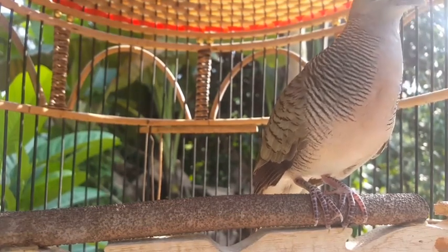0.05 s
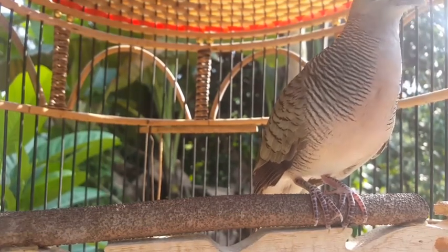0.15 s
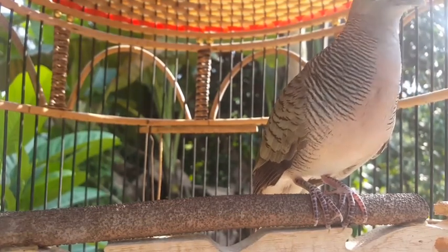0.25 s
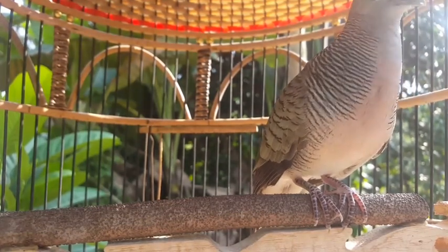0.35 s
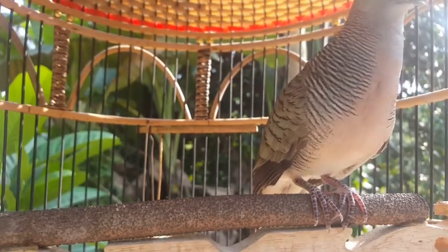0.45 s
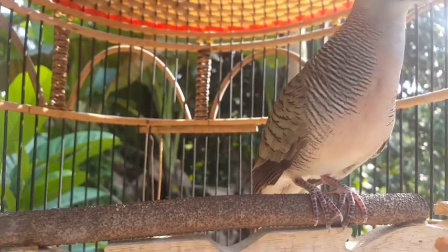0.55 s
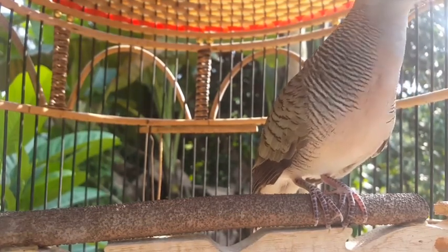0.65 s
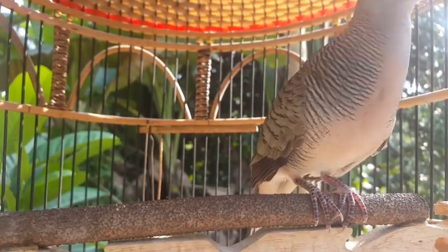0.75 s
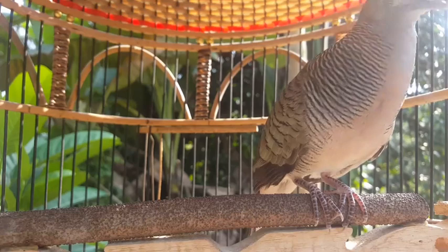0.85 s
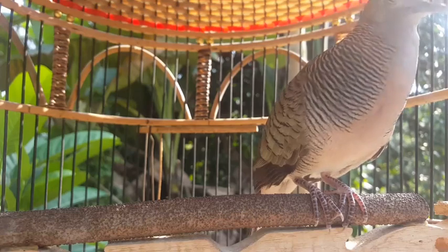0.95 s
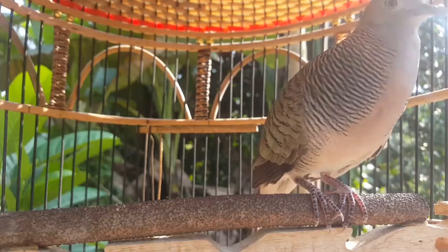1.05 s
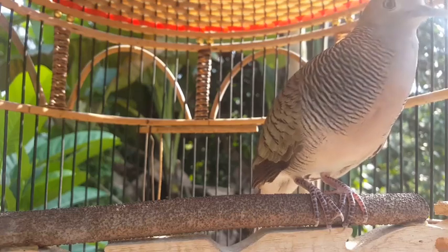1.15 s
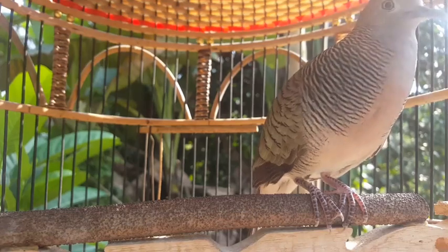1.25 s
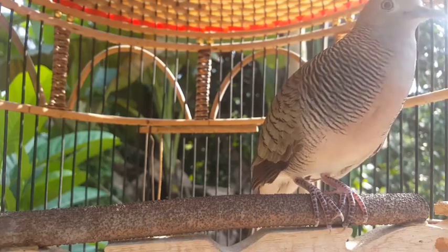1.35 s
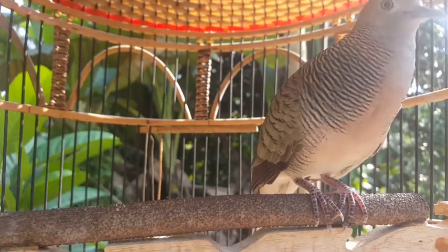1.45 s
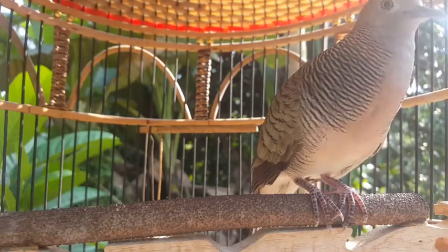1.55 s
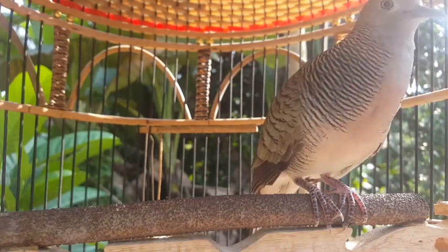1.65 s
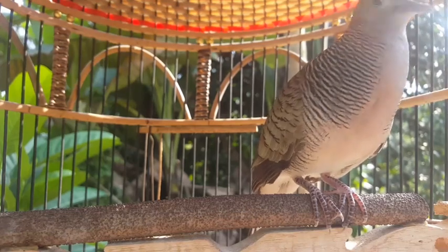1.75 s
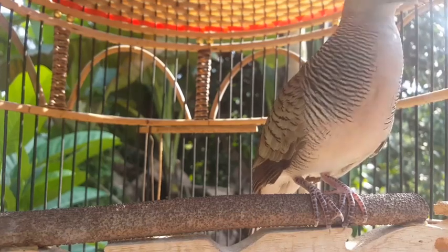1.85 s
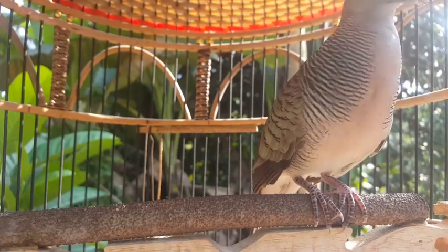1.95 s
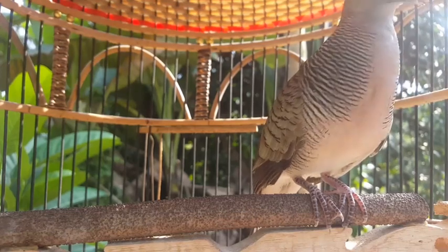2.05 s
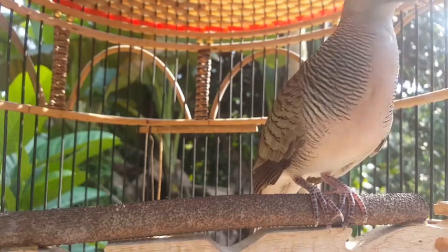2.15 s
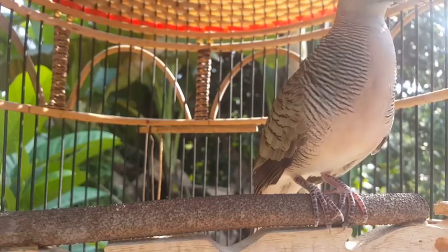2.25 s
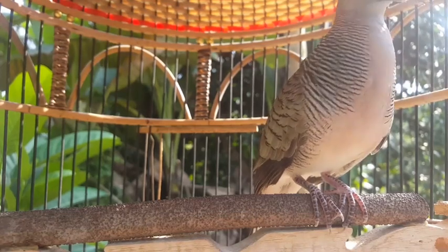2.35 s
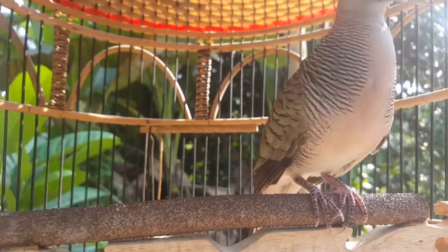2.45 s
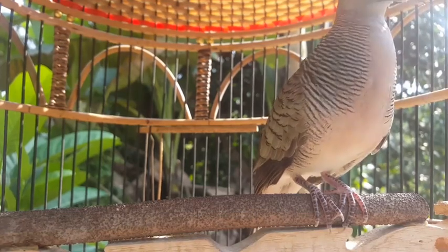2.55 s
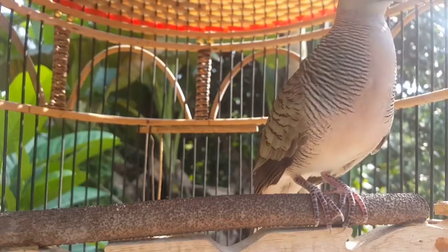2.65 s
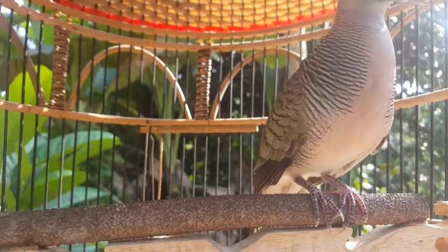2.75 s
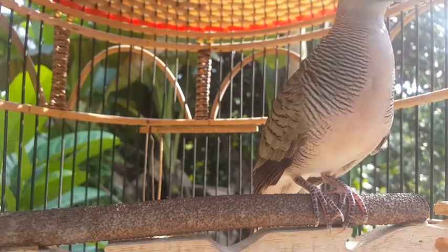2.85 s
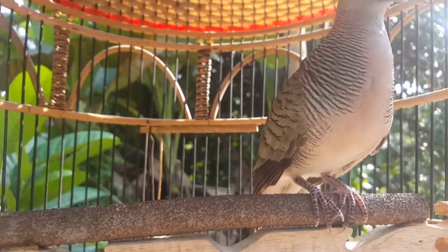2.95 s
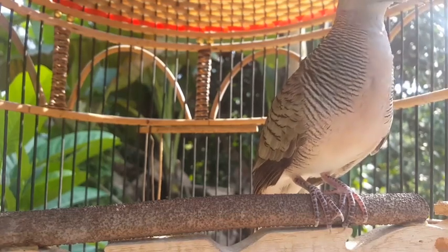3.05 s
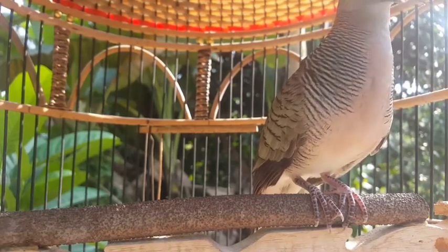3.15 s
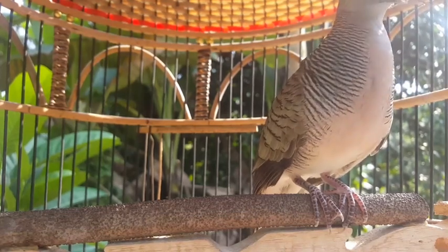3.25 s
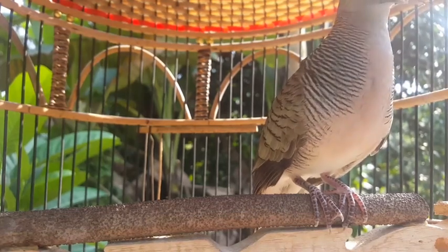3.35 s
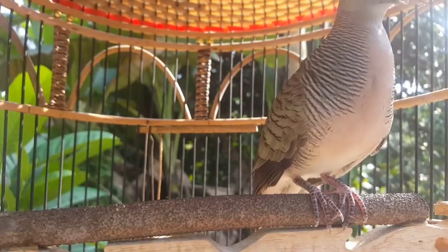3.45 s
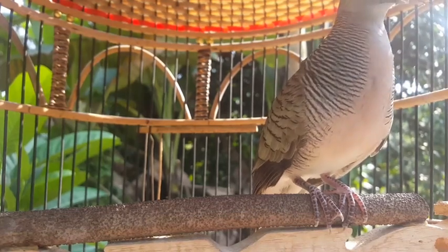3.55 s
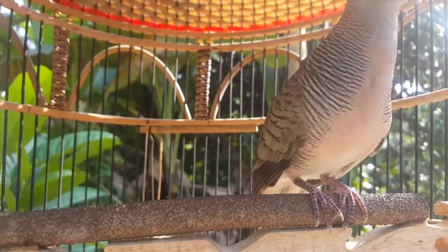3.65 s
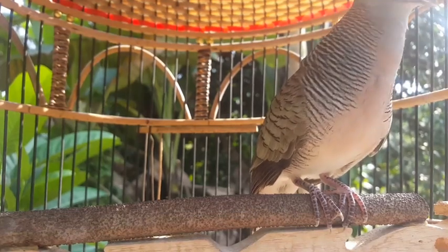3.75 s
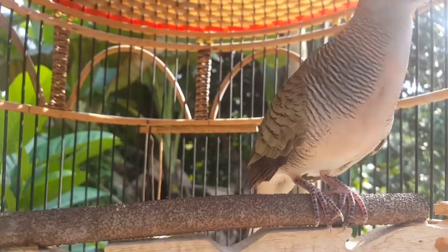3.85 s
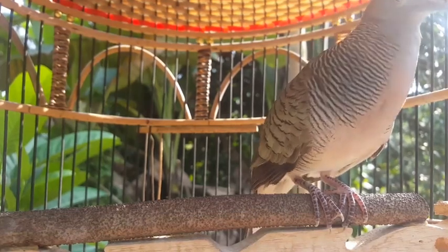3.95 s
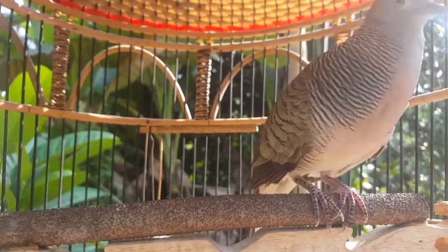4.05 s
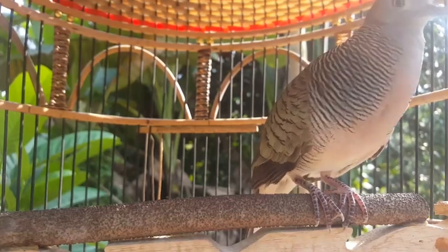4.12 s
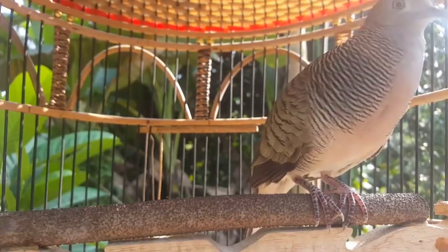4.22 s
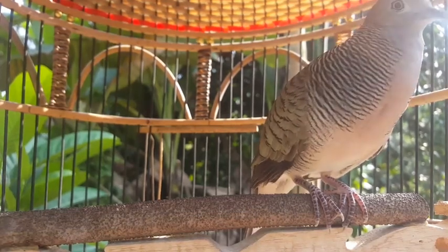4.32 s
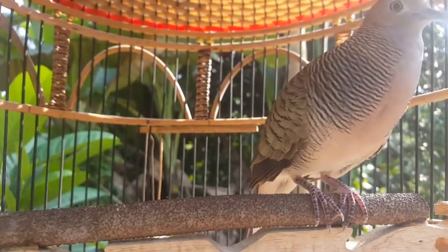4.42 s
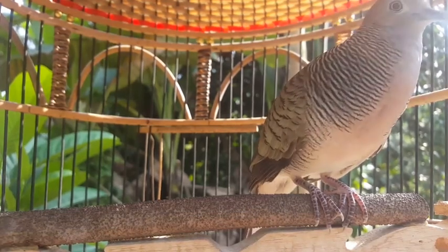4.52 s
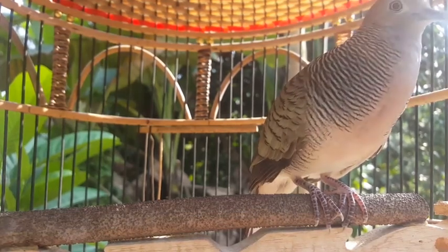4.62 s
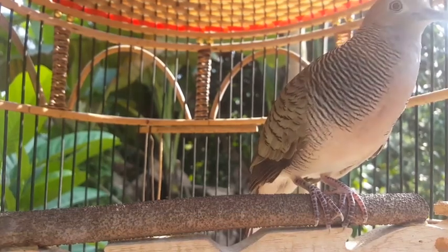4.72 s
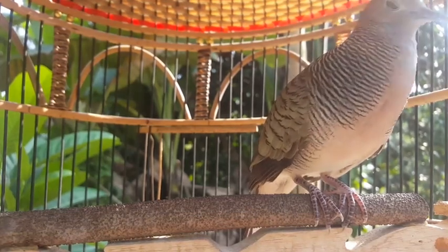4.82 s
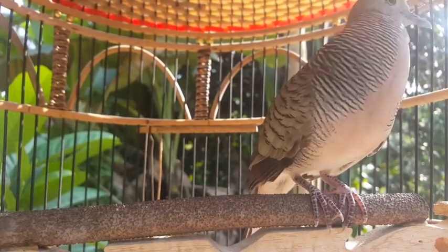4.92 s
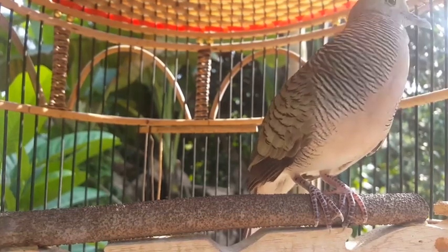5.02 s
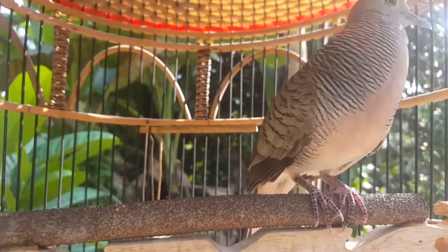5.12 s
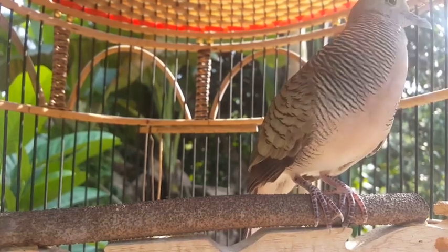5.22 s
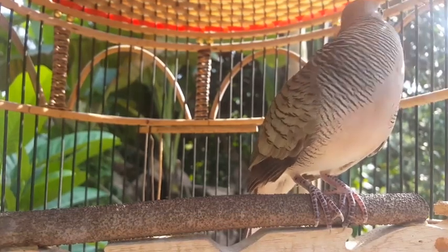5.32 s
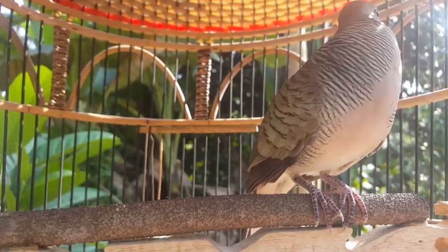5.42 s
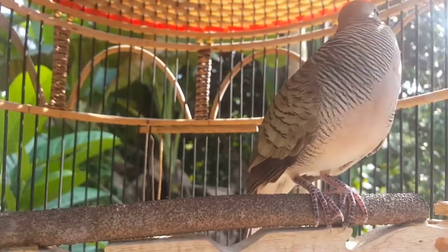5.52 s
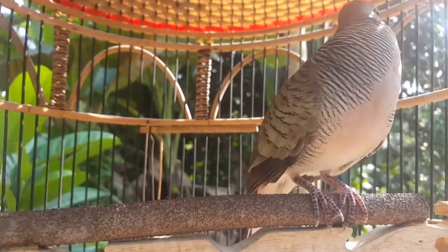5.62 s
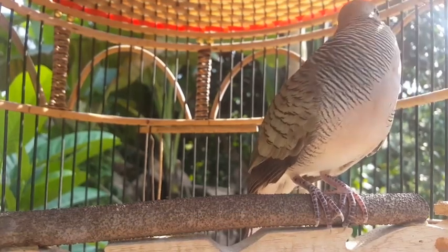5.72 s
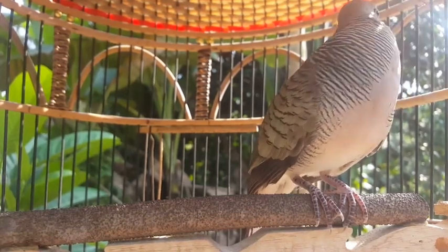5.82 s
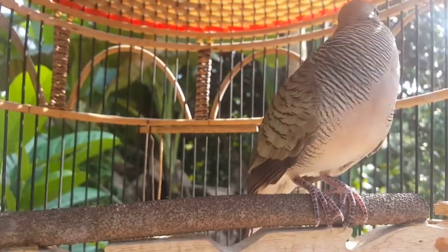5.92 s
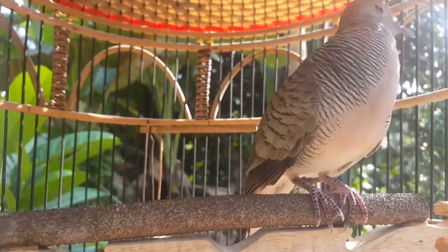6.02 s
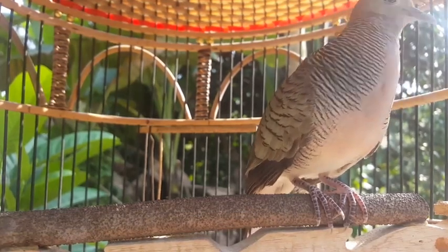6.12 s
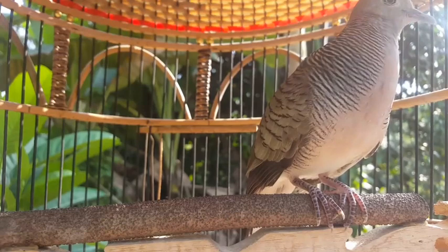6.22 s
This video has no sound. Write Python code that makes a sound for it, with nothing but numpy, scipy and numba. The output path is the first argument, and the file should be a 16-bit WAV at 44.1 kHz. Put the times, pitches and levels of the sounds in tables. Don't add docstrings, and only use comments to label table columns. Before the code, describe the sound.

A caged dove gives two loud, bubbly cooing calls close by while a single-cylinder motorbike thuds past behind and slowly draws away outdoors.

```python
import sys
import numpy as np
from scipy import signal
from scipy.fft import rfft, irfft
from scipy.io import wavfile
from scipy.ndimage import uniform_filter1d
from numba import njit

SR = 44100
rng = np.random.default_rng(int(sys.argv[2]) if len(sys.argv) > 2 else 0)


def generate_wav(sig):
    pcm = np.round(np.clip(np.atleast_2d(sig).T, -1, 1) * 32767).astype(np.int16)
    wavfile.write(sys.argv[1], SR, pcm)


def decibels_to_gain(level_db):
    exponent = np.asarray(level_db, float) / 20
    return 10 ** exponent


N = 276948
T = np.arange(N) / SR

# start_s, register_flip_s, end_s, top_pitch_hz, level_db
COO_NOTES = [
    (.8865, .921, 1.082, 1158, -9.5),
    (1.082, 1.095, 1.124, 1028, -9),
    (1.151, 1.158, 1.176, 880, -13),
    (1.2265, 1.239, 1.262, 978, -10),
    (1.325, 1.337, 1.393, 1018, -10),
    (3.993, 4.023, 4.190, 1160, -9.5),
    (4.192, 4.200, 4.231, 1028, -8.5),
    (4.259, 4.272, 4.289, 950, -10.5),
    (4.338, 4.349, 4.382, 998, -9.5),
    (4.451, 4.463, 4.528, 1030, -8.5),
]
# share_of_length (0-1), pitch_ratio, level_db
LONG_NOTE = [(0, .93, 2.5), (.13, 1.0, .5), (.46, .993, .8), (.48, .98, 1.5), (.72, .95, .5),
             (.75, .935, 2.5), (.84, .95, 2), (.93, .885, .5), (1, .885, -5)]
SHORT_NOTE = [(0, .985, -.5), (.3, 1.0, .5), (.6, .98, -.5), (.8, .95, -3), (.9, .86, -8), (1, .85, -16)]
TIED_NOTE = [(0, .99, -1.5), (.4, 1.0, 3), (.65, .98, 1), (.85, 0.89, -7), (1, 1, -17)]
CLOSING_NOTE = [(0, 0.98, -1.5), (.25, 0.98, 1), (.6, .99, -1), (.8, 0.97, -3.5), (.87, .83, -10.5),
                (1, 0.72, -17)]
# harmonic_number, level_db
VOICE_OVERTONES = [(2, -35), (3, -48), (5, -55)]
# time_s, level_db
THROAT_CREAKS = [(.8609, -25), (.8641, -28), (.868, -20.5), (.872, -21), (.8756, -22), (.8787, -15),
                 (.8816, -17), (.8836, -30), (1.1374, -26.5), (1.1432, -24), (1.1452, -25.5), (1.2122, -25),
                 (1.2178, -25.5), (1.2197, -24), (1.2215, -23), (1.3109, -28), (1.3162, -26.5),
                 (1.3191, -25), (1.322, -25), (3.969, -28), (3.9733, -22), (3.9778, -23), (3.9806, -21.5),
                 (3.9837, -21), (3.9871, -19), (3.9887, -16), (3.9904, -28.5), (4.246, -30), (4.2506, -22),
                 (4.2544, -28.5), (4.3235, -25.5), (4.3287, -25), (4.3315, -19.5), (4.3345, -23.5),
                 (4.4371, -24), (4.4428, -23), (4.4445, -24.5), (4.4465, -27)]

# bark_db, upper_bark_db, muffler_ring_db, engine_side_db
BIKE_PASS = [(0, -18.5, -58, -2, -1.5, 9, 1, -2), (.2, -19, -55, -9, 1, 7, 11, 1),
             (.55, -19, -54, -0.5, 2.5, -8, -7, -0.5), (0.8, -18.5, -50.5, 2.5, 0, 0, 5.5, 1.5),
             (1.499, -22.5, -55, 5.5, 3.5, -4, -0.5, 0), (1.75, -22.5, -51, -5.5, -1, 8.5, 0, -3),
             (2.0, -20.5, -50.5, -8, 1, -9, 6, -1), (2.2, -22, -48.5, 7.5, 2, 6, -25, 1),
             (2.45, -22.5, -49, 1, 6.5, -4, 5, 1.5), (2.749, -24, -50, -1, 7, -3, 3, 2),
             (2.95, -22.5, -48.5, -6.5, 1.5, -16.5, 4.5, 0), (3.4, -24, -50.5, -5.5, 1.5, 1, -1, -3),
             (3.8, -23, -61, 4, 2, 2.5, 2, 3.5), (4.399, -26, -61.5, 6, 2.5, 3.5, 1.5, 4),
             (4.85, -23.5, -59, -7.5, -1.5, 6, -1, -3), (5.4, -26.5, -71.5, -1, -2.5, 10, 4.5, 3.5),
             (5.85, -27, -74, -2.5, -5.5, -19, 6, -3), (6.28, -28, -71.5, 5, 5.5, -20, -1, -0.5)]
# time_s, speed_rpm
ENGINE_SPEED = [(0, 3135.2), (.75, 3243.2), (2, 3247.1), (2.5, 3315.6), (2.85, 3263.2), (3.4, 3315.8),
                (4.4, 3301.1), (4.65, 3265.5), (6.28, 3218)]
# pitch_hz, width_hz
PIPE_MODES = [
    (106, 44),
    (148, 75),
    (545, 20),
]
# time_s, bark_hz, upper_bark_hz
BARK_MODES = [(0, 253.7, 398), (.3, 276, 425), (.6, 257, 375), (.9, 259, 352), (1.5, 258, 355),
              (2.0, 265.5, 375), (2.3, 267, 357), (2.65, 267, 352), (3.0, 250.6, 357), (3.4, 256.6, 350),
              (3.9, 270, 360), (4.8, 257, 405), (5.5, 249, 365), (6.28, 243.5, 380)]
# time_s, lag_ms, level_db
NEAR_WALL = [(0, 7.85, -0.5), (.6, 7.3, -12), (2.1, 7.43, -5), (3.3, 8.02, -8.5), (4.5, 7.63, -4.5),
             (6.28, 8.4, -7.5)]
# centre_s, length_s, pitch_hz, level_db
YARD_RESONANCES = [(0.235, 0.26, 417.7, -35), (.5, 0.16, 483, -46.5), (1.596, 0.36, 582, -44),
                   (2.4, .3, 300, -45.5), (2.7, .6, 350, -46.5), (2.9, 0.23, 620, -55),
                   (3.21, 0.4, 166.1, -34.5), (3.098, 0.15, 247, -45.5), (4.902, .4, 405.6, -50.5),
                   (5.2, 0.5, 290, -43), (5.5, 0.34, 469, -50.5), (5.404, 0.34, 246, -47.5),
                   (5.803, 0.35, 163, -37.5)]
# pitch_hz, width_hz, level_over_crack_db
TAILPIPE_RINGS = [(976, 170, 5.5), (1935, 250, 0), (2224, 320, 1.5), (3135, 790, -4)]
# pitch_hz, density_db (per Hz)
CLATTER_SPECTRUM = [(300, -56), (500, -21), (700, -26), (1000, -23), (1500, -29.5), (2100, -31.5),
                    (3000, -40), (4500, -44), (7000, -54.5)]
# pitch_hz, density_db (per Hz)
CRACK_SPECTRUM = [(2000, -49.5), (4000, -35.5), (6300, -36), (8200, -43), (9500, -38), (11000, -51.5),
                  (15000, -56.5), (16000, -55)]
# time_s, level_db
EXHAUST_SNAPS = [(1.197, -44), (1.2736, -38.5), (1.384, -42), (1.571, -41), (1.607, -43.5), (1.6441, -40),
                 (1.7202, -45.5), (1.754, -41), (1.83, -38.5), (1.9032, -40), (1.9387, -35.5),
                 (2.0876, -38), (2.159, -42.5), (2.1963, -43), (2.3788, -48.5), (2.417, -41.5),
                 (2.4875, -49), (2.5624, -43.5), (2.5963, -38), (2.6347, -46.5), (2.816, -40.5),
                 (2.9273, -48), (3.0003, -46), (3.0375, -49), (3.1823, -47), (3.2565, -39.5),
                 (3.3628, -38.5), (3.4015, -42.5)]

# pitch_hz, level_db
LEAF_BANDS = [(850, -53.5), (1000, -56.5), (1750, -59), (2050, -66), (2400, -63), (2800, -64),
              (3300, -65.5), (3900, -69)]
# centre_s, length_s, pitch_hz, level_db
BUSH_GUSTS = [(.6, 0.44, 687, -39), (1.9, 0.26, 600, -41.5), (2.3, .2, 2050, -46), (2.9, .15, 2620, -54),
              (3.4, 0.22, 2040, -48), (4.773, 0.068, 3191, -53), (4.75, 0.079, 1910, -54),
              (5.044, 0.069, 1780, -50), (5.093, .07, 3300, -56), (5.15, 0.046, 2380, -48.5),
              (5.45, .07, 2100, -58), (5.754, 0.062, 2130, -52), (6.003, .06, 1750, -55)]
# pitch_hz, density_db (per Hz)
AIR_SPECTRUM = [(25, -99), (42, -74), (54, -64), (130, -74), (300, -64), (550, -70), (1400, -97.5),
                (2200, -86.5), (4400, -97.5), (6500, -102), (10000, -111), (15000, -121)]
# pitch_hz, level_db
STEADY_WHINES = [(1362, -60), (4845, -69), (5028, -68), (5179, -73), (6874, -80)]
# pitch_hz, left_minus_right_db
PORT_SHADING = [(300, 0), (700, -1.5), (1290, -.6), (2380, 4.5), (4400, 8.5), (8120, 10.5), (15000, 3)]
# pitch_hz, likeness (0-1)
PORT_LIKENESS = [(130, 1), (290, 0.82), (640, 0.6), (1410, 0), (3100, 0.4), (6820, 0), (15000, 0.4)]


def level(x, db):
    return x * decibels_to_gain(db) / np.sqrt(np.mean(x ** 2))


def on_log(hz, table):
    f, v = np.transpose(table)
    return np.interp(np.log(np.maximum(hz, 1)), np.log(f), v)


def over_time(table):
    s, *columns = np.transpose(table)
    return [np.interp(T, s, c) for c in columns]


def swell(centre_s, length_s):
    return np.exp(-((T - centre_s) / length_s) ** 2)


def ring(x, hz, width_hz):
    return signal.lfilter(*signal.iirpeak(hz, hz / width_hz, fs=SR), x)


@njit
def slide(x, hz, width_hz):
    y, band, low = np.empty(len(x)), 0., 0.
    for i in range(len(x)):
        g, k = np.tan(np.pi * hz[i] / SR), width_hz / hz[i]
        v = (band + g * (x[i] - low)) / (1 + g * (g + k))
        band, low, y[i] = 2 * v - band, low + 2 * g * v, k * v
    return y


def dull(x, hz):
    return signal.sosfilt(signal.bessel(4, hz, fs=SR, output="sos", norm="mag"), x)


def decay(x, time_s):
    return signal.lfilter([1], [1, -np.exp(-1 / (time_s * SR))], x)


def colour(x, table):
    return irfft(rfft(x) * decibels_to_gain(on_log(np.fft.rfftfreq(N, 1 / SR), table)), N)


def walk(rate):
    k = int(SR / rate)
    held = np.repeat(rng.standard_normal(N // k + 1), k)
    return 1.3 * uniform_filter1d(uniform_filter1d(held, k), k)[:N]


def wide(table, flicker_db):
    hz = np.fft.rfftfreq(N, 1 / SR)
    alike = np.clip(on_log(hz, PORT_LIKENESS), 0, 1)
    mid, side = rfft(rng.standard_normal((2, N))) * np.sqrt(SR / 4)
    both = np.sqrt(1 + alike) * mid + np.sqrt(1 - alike) * side * np.array([[1], [-1]])
    both = both * decibels_to_gain(on_log(hz, table))
    octave = np.log2(np.maximum(hz, 1) / 40)
    noise = 0
    for k in range(10):
        band = irfft(both * np.clip(1 - abs(octave - k), 0, 1), N)
        noise = noise + band * decibels_to_gain(flicker_db * walk(13))
    return noise


def delayed(x, lag_ms):
    return np.interp(T - lag_ms / 1000, T, x)


def echoes(x, t60_s, start_s):
    t = T[:SR // 2]
    tail = rng.standard_normal((2, len(t))) * decibels_to_gain(-60 * t / t60_s) * (t > start_s)
    return signal.fftconvolve(x[None], tail / np.sqrt(np.sum(tail ** 2) / 2))[:, :N]


def coo_contour():
    low_hz, scoop_s = 873, .004
    scoop_pitch, scoop_db = np.array((.76, .89, .975, 1.03)), (-30, -9, -3.5, -2.5)
    flutter_s, flutter_share = .039, .007
    hz, db = np.full(N, 870.), np.full(N, -120.)
    notes = np.array(COO_NOTES)
    pauses = notes[:, 0] - np.r_[0, notes[:-1, 2]]
    for (start, flip, end, top_hz, note_db), pause in zip(COO_NOTES, pauses):
        length, tied = end - flip, pause < .01
        if length > .1:
            shape = LONG_NOTE
        elif length > .05:
            shape = CLOSING_NOTE
        else:
            shape = TIED_NOTE if tied else SHORT_NOTE
        share, ratio, shape_db = np.transpose(shape)
        before = start - min(pause + .001, .004)
        s = np.r_[before, start, start + scoop_s, flip - .001, flip + share * length, end + .002]
        now = (T > s[0]) & (T < s[-1])
        t = T[now]
        hz[now] = np.interp(t, s, np.r_[low_hz * scoop_pitch, top_hz * ratio, top_hz * ratio[-1]])
        if length > .1:
            hz[now] *= 1 + flutter_share * (t > flip) * np.cos(2 * np.pi * (t - flip - flutter_s / 2) / flutter_s)
        catch_db = np.maximum(scoop_db, -9 if tied else -99)
        db[now] = note_db + np.interp(t, s, np.r_[catch_db, shape_db, -45])
    return hz, db


def throat_creak():
    clicks = np.zeros(N)
    at, creak_db = np.transpose(THROAT_CREAKS)
    clicks[(at * SR).astype(int)] = decibels_to_gain(creak_db)
    wide_tract = ring(ring(clicks, 950, 500), 1100, 500)
    narrow_tract = ring(ring(clicks, 750, 230), 1000, 400)
    creak = dull(wide_tract + 0.76 * narrow_tract, 2200)
    return decibels_to_gain(39.5) * signal.sosfilt(signal.butter(6, 1500, fs=SR, output="sos"), creak)


def dove():
    hz, db = coo_contour()
    phase = 2 * np.pi * np.cumsum(uniform_filter1d(hz, size=90) * (1 + 0.0049 * walk(120))) / SR
    voice = np.sqrt(2) * uniform_filter1d(decibels_to_gain(db), size=90) * decibels_to_gain(0.14 * walk(170))
    high_opening = np.clip((hz - 990) / 160, .1, 1.2)
    scoop_opening = 2.1 * np.clip((885 - hz) / 80, 0, 1)
    overtones = 0
    for k, overtone_db in VOICE_OVERTONES:
        beads = decibels_to_gain(1.1 * k * walk(60) + 3 - k)
        overtones = overtones + decibels_to_gain(overtone_db) * beads * np.sin(k * phase)
    overtones = voice * np.maximum(high_opening, scoop_opening) * overtones
    voiced = voice * np.sin(phase) + throat_creak()
    direct = voiced * decibels_to_gain(np.array([[-3.6], [2.2]]))
    air_sac = ring(voiced, 872, 58) * decibels_to_gain(np.array([[-8.5], [2.3]]))
    cage = decibels_to_gain(-6.5) * ring(voiced, 1102, 60) * np.array([[1], [-1]])
    yard_ring = decibels_to_gain(-19) * echoes(voiced, .05, .001) + decibels_to_gain(-31) * echoes(voiced, .2, .02)
    return direct + air_sac + cage + overtones * decibels_to_gain(np.array([[2.2], [-2.5]])) + yard_ring


def firings():
    cycles = .94 + np.cumsum(over_time(ENGINE_SPEED)[0]) / 120 / SR
    at = np.interp(np.arange(1, cycles[-1]), cycles, T)
    chance = rng.standard_normal((len(at), 3))
    heard = (at > .002) & (at < N / SR - .01)
    index = ((at + .00006 * chance[:, 0]) * SR).astype(int)[heard]
    pulses, cracks = np.zeros(N), np.zeros(N)
    pulses[index - 20] = decibels_to_gain(.7 * chance[heard, 1])
    cracks[index - 40] = decibels_to_gain(1.1 * chance[heard, 2])
    return pulses, cracks


def exhaust_bark(pulses, bark_db, upper_db):
    bark_hz, upper_hz = over_time(BARK_MODES)
    barks = pulses * decibels_to_gain(.8 * walk(27.02))
    bark = decibels_to_gain(bark_db) * level(slide(dull(barks, 1500), bark_hz, 82.0), 0)
    bark = bark + decibels_to_gain(upper_db - 13.0) * level(slide(dull(barks, 520), upper_hz, 99.0), 0)
    return bark - decibels_to_gain(-11) * delayed(bark, 18.6 - .08 * T)


def exhaust_pipe(pulses, loud_db, lean_db, bark_db, upper_db, rasp_db):
    boom_mode, thud_mode, rasp_mode = PIPE_MODES
    suction = -dull(dull(pulses, 300), 300)
    boom = level(ring(suction, *boom_mode), 0) * decibels_to_gain(-11.5 + lean_db)
    thud = level(ring(suction, *thud_mode), 0) * decibels_to_gain(-9 - lean_db / 2)
    bark_gain = decibels_to_gain(-14 + 0.54 * (loud_db + 20.0) + .6 * walk(2.5))
    bark = exhaust_bark(pulses, bark_db, upper_db) * bark_gain
    pipe = (boom + thud + bark) * decibels_to_gain(loud_db)
    pipe = pipe + decibels_to_gain(-15) * delayed(pipe, 19.86 + 0.3 * T + 0.4404 * T ** 2)
    pipe = signal.sosfilt(signal.butter(3, 72, "high", fs=SR, output="sos"), pipe)
    drone = level(ring(ring(suction, 55, 34), 55, 34), -26.5) * decibels_to_gain(loud_db + 11 * swell(3.3, 0.5))
    lag_ms, wall_db = over_time(NEAR_WALL)
    wall = decibels_to_gain(wall_db) * dull(delayed(pipe, lag_ms - .4), 700)
    rasp = ring(level(ring(dull(pulses, 1800), *rasp_mode), 0), *rasp_mode)
    rasp = level(rasp, -49) * decibels_to_gain(rasp_db + 1.1 * walk(2.3))
    yard_back = echoes(pipe, 0.1, 0.012)
    back = decibels_to_gain(-9) * (yard_back.mean(axis=0) + .12 * yard_back)
    return pipe + wall + drone + rasp + back


def yard_resonances(pulses):
    width_hz, total = 14, 0
    for centre_s, length_s, hz, db in YARD_RESONANCES:
        mode = ring(ring(pulses, hz, 4 * width_hz), hz, width_hz)
        total = total + level(mode, db) * swell(centre_s, length_s)
    return total


def tailpipe_and_engine(cracks, loud_db, crack_db, side_db):
    puff = dull(decay(cracks, 0.0027), 940)
    beat = 0.88 + 1.6 * puff * decibels_to_gain(2.9 * (crack_db + 43.0))
    engine_db = (uniform_filter1d(loud_db, size=SR) + crack_db) / 2 + side_db - 9.0
    clatter = wide(CLATTER_SPECTRUM, 0.39) * beat * decibels_to_gain(engine_db)
    rush = decay(cracks, .002)
    ticks = 0
    for hz, width_hz, db in TAILPIPE_RINGS:
        uneven = (cracks + 0.45 * rush * rng.standard_normal(N)) * decibels_to_gain(1.2 * walk(27))
        ticks = ticks + level(ring(ring(uneven, hz, width_hz), hz, 2 * width_hz), db)
    ticks = ticks * decibels_to_gain(0.92 * (crack_db + 51.5) + side_db - 54.5)
    crack = wide(CRACK_SPECTRUM, 2.2) * (0.57 + 1.55 * puff) * decibels_to_gain(crack_db)
    return ticks + clatter + crack


def motorbike():
    loud_db, crack_db, lean_db, bark_db, upper_db, rasp_db, side_db = over_time(BIKE_PASS)
    pulses, cracks = firings()
    low = exhaust_pipe(pulses, loud_db, lean_db, bark_db, upper_db, rasp_db) + yard_resonances(pulses)
    return low + tailpipe_and_engine(cracks, loud_db, crack_db, side_db)


def exhaust_snaps():
    s, db = np.transpose(EXHAUST_SNAPS)
    starts = np.zeros(N)
    starts[(s * SR).astype(int)] = decibels_to_gain(db - 3)
    burst = decay(starts, .0025) * rng.standard_normal(N)
    return ring(burst, 9200, 5000) + decibels_to_gain(-4) * ring(burst, 13000, 4000)


def rustle(hz):
    return level(ring(ring(rng.standard_normal((2, N)), hz, hz / 7), hz, hz / 5), 0)


def leaves():
    total = 0
    for centre_s, length_s, hz, db in BUSH_GUSTS:
        total = total + rustle(hz) * decibels_to_gain(db) * swell(centre_s, length_s)
    for hz, db in LEAF_BANDS:
        total = total + rustle(hz) * decibels_to_gain(db + 3 * walk(14))
    return total


def yard():
    insects = level(ring(ring(rng.standard_normal(N), 4840, 240), 5040, 340), -59.5)
    insects = insects * decibels_to_gain(1.3 * walk(30))
    whines = 0
    for hz, db in STEADY_WHINES:
        gain = np.sqrt(2) * decibels_to_gain(db + 2 * walk(3))
        whines = whines + gain * np.sin(2 * np.pi * np.cumsum(hz + 2 * walk(4)) / SR)
    breeze = level(ring(ring(rng.standard_normal(N), 52, 25), 52, 25), -61.5)
    return wide(AIR_SPECTRUM, 2.2) + insects + whines + breeze


def duck():
    release_s, depth_db = .054, -4.5
    start, end = np.array(COO_NOTES)[:, 0], np.array(COO_NOTES)[:, 2]
    since = np.maximum(T - end[:, None], 0)
    held = np.max((T > start[:, None]) * np.exp(-since / release_s), axis=0)
    return decibels_to_gain(depth_db * uniform_filter1d(held, size=900))


def scene():
    far = (motorbike() + exhaust_snaps() + leaves() + yard()) * duck()
    lean = np.array(PORT_SHADING) * [1, .5]
    return dove() + np.array([colour(far[0], lean), colour(far[1], lean * [1, -1])])


def top_cut(x):
    return signal.sosfilt(signal.butter(12, 15740, fs=SR, output="sos"), x)


def record(dry):
    ceiling, top_hz = .95, 15700
    held = dry / (1 + (dry / ceiling) ** 8) ** (1 / 8)
    cut = signal.sosfilt(signal.ellip(8, .2, 60, top_hz, fs=SR, output="sos"), held)
    return top_cut(cut)


dry = scene()
out = record(dry)
generate_wav(out)
```